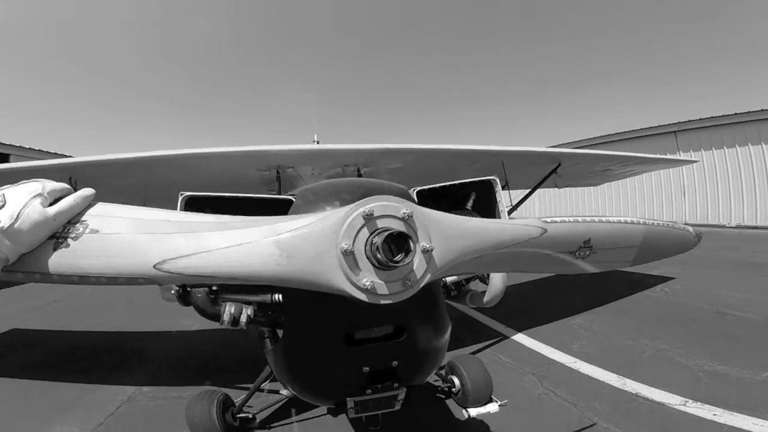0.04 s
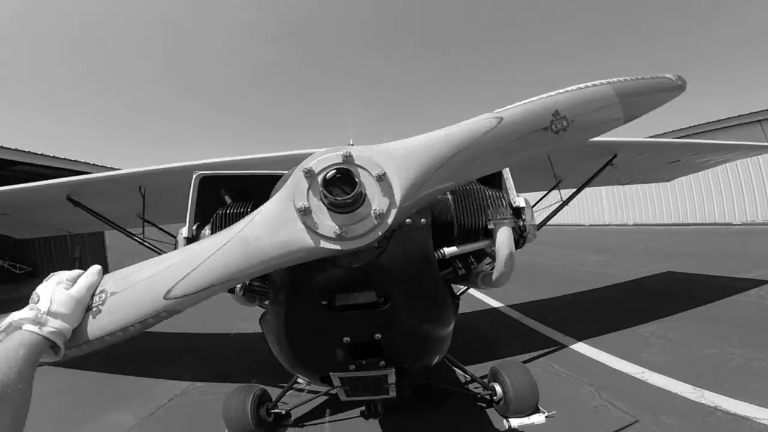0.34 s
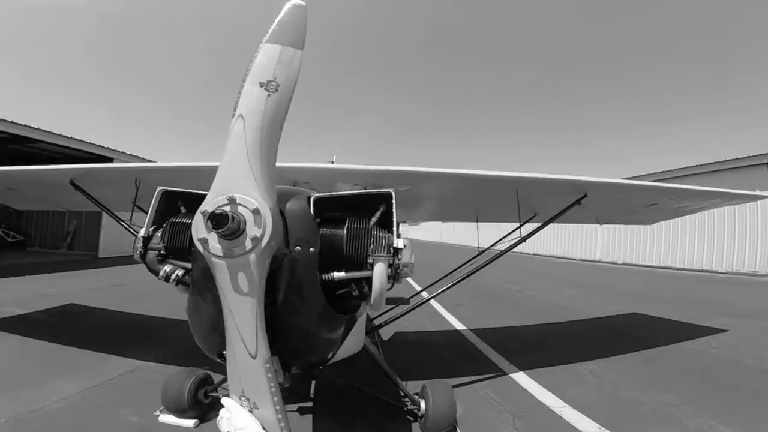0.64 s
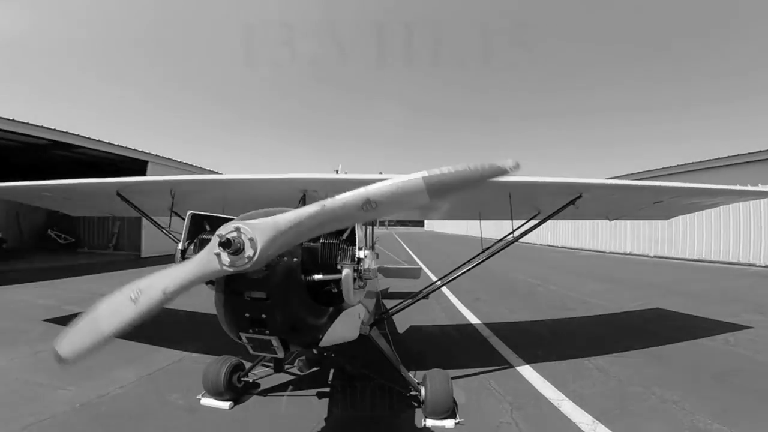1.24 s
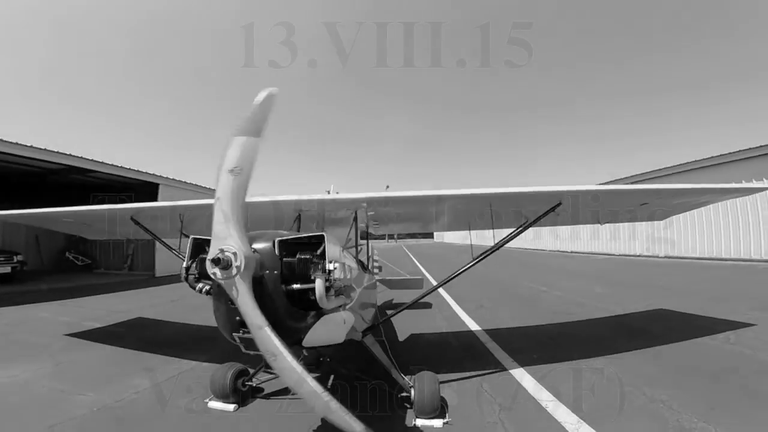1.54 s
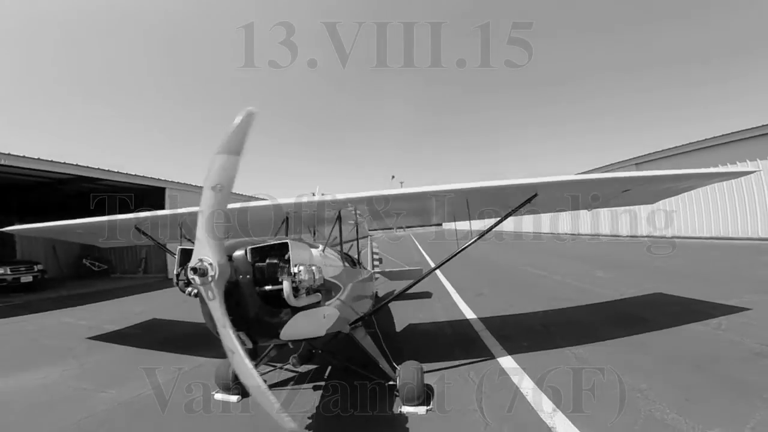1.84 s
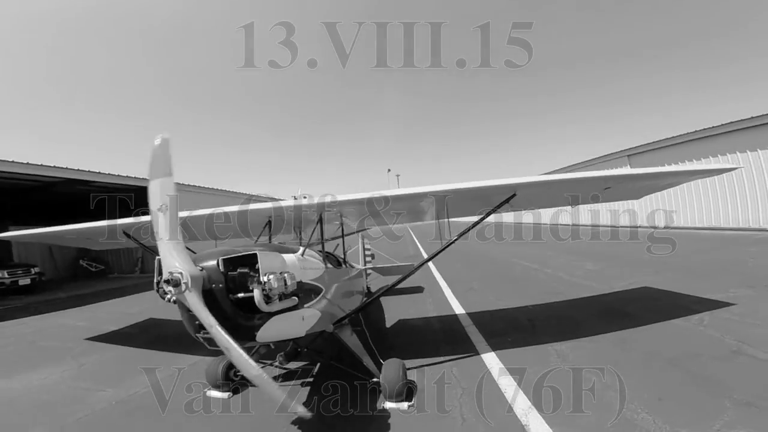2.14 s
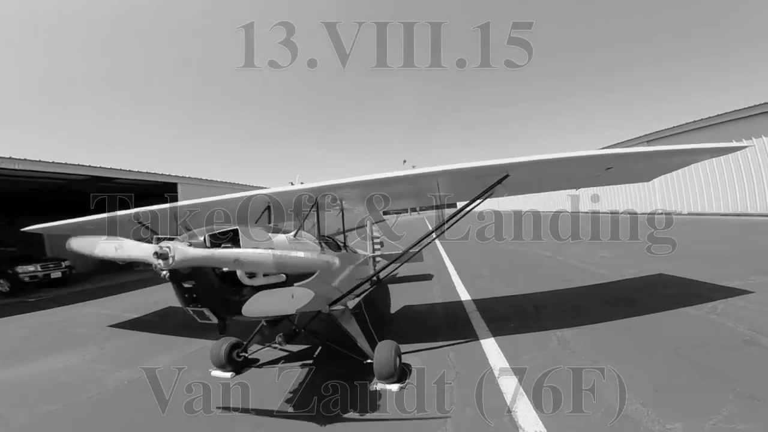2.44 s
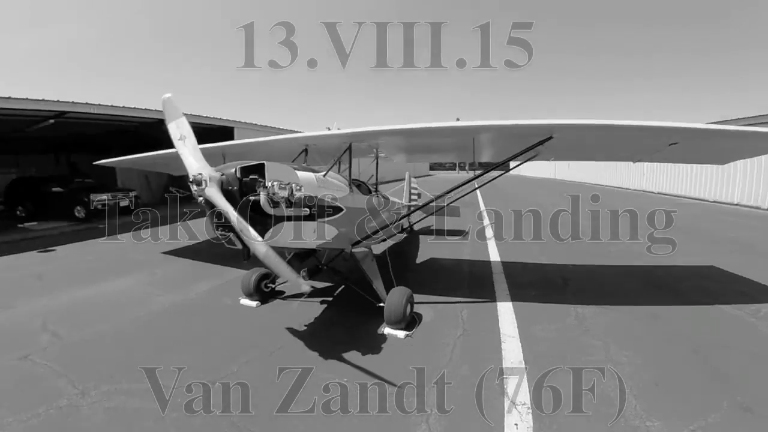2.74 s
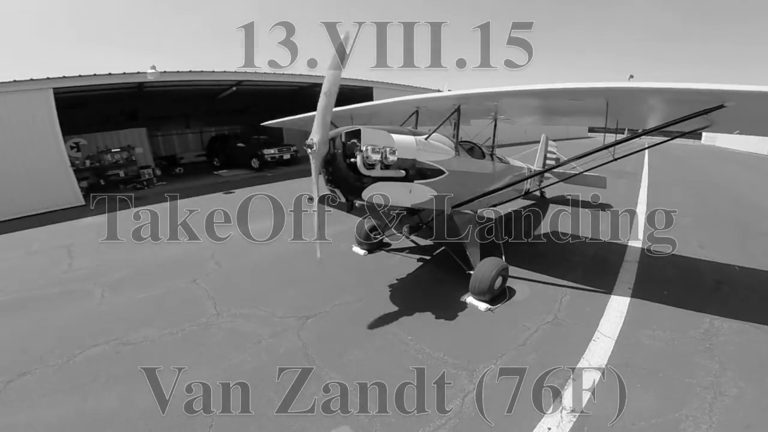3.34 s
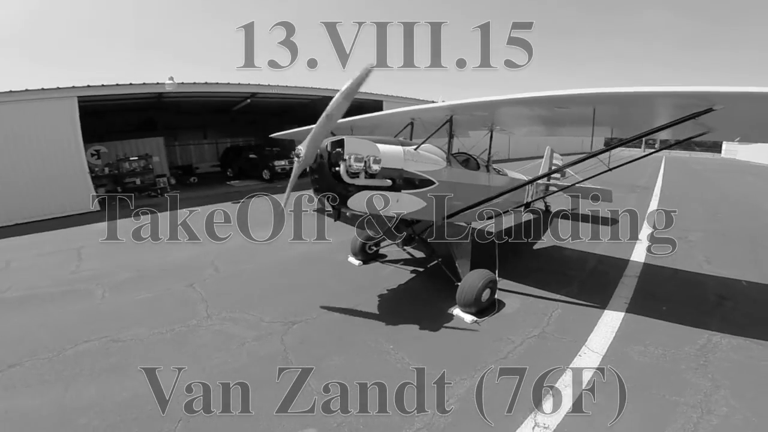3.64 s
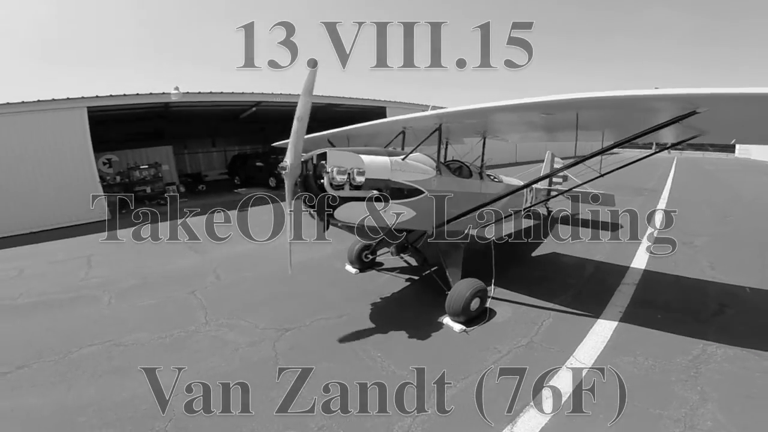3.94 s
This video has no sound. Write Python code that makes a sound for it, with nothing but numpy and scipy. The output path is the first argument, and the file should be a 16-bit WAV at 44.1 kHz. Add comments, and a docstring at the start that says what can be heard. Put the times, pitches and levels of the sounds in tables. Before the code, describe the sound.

A small airplane engine is started by hand outdoors, close to the microphone. It rasps as it turns, gives a metallic clack, then fires with hissing pops and chugs unevenly while wind and propeller wash buffet the microphone.

```python
"""A small airplane engine is swung by hand on an open apron and catches, close to the microphone.
Each firing vents a puff of turbulent gas that hisses and excites the resonances of the exhaust stacks.
The magneto's impulse coupling clacks and rings the crankcase; between firings the engine coasts on
with dull compression chugs over the clatter of gears and valves. Wind and propeller wash buffet
the microphone."""
import sys
import numpy as np
from scipy import signal
from scipy.fft import rfft, irfft
from scipy.io import wavfile

SR = 44100
rng = np.random.default_rng(int(sys.argv[2]) if len(sys.argv) > 2 else 0)


def inscribe(sig):
    """Save sig as 16-bit PCM at rate SR to the path in sys.argv[1].

    A 1-D sig is mono; a 2-D sig holds one channel per row.
    Samples are clipped to [-1, 1] before scaling.
    """
    pcm = np.round(np.clip(np.atleast_2d(sig).T, -1, 1) * 32767)
    wavfile.write(sys.argv[1], SR, pcm.astype(np.int16))


N = 176400

# exhaust puffs: peak_s, hiss_db, stack_ring_db, body_db, pressure_wave_db, half_width_s
EXHAUST_PUFFS = [(1.087, -27, -30, -27, -12, 0.0068), (1.271, -25.5, -25, -13.5, -11, 0.012),
                 (1.411, -27.5, -36.5, -20.5, -13, 0.013), (1.525, -29, -38, -18.5, -8.5, 0.011),
                 (2.771, -35, -37, -32, -31, 0.0087), (2.803, -23.5, -20.5, -15, -10, 0.0097),
                 (2.881, -32.5, -46, -20, -24, 0.0049), (2.935, -21.5, -20.5, -13.5, -7.5, 0.0099),
                 (3.188, -29, -18, -15, -9, 0.0085), (3.564, -28, -34, -19.5, -11, 0.011),
                 (3.796, -23, -23.5, -17.5, -8, 0.01)]
# spectra of a puff's hiss and hollow body: frequency_hz, density_db
HISS_SPECTRUM = [(300, -36.5), (900, -16), (1600, 2.5), (2300, 1.5), (2900, 0), (4100, 7.5), (5000, -3),
                 (6300, -6.5), (7700, -20.5)]
PUFF_BODY_SPECTRUM = [(40, -17), (90, -0.5), (200, -2.5), (280, -3.5), (480, -5), (590, -2), (700, -9.5),
                      (950, -10.5), (2000, -32), (6000, -57)]
# resonances of the exhaust stacks: pitch_hz, bandwidth_hz, level_db
STACK_MODES = [(1284, 48, 3), (2715, 70, 4), (2905, 110, 2.5), (3423, 55, 2), (3887, 57, -0.5),
               (4190, 57, -7)]
# blows of the coupling: start_s, level_db, treble_db, rebound_delay_s, rebound_db, hollow_hz, hollow_db
COUPLING_BLOWS = [(.850, -6.5, 1.5, 0.033, -3, 520, -4.5), (1.124, -12, -0.5, .019, 2.5, 820, -8.5),
                  (1.319, -13, -5, .022, 1, 630, -1), (2.970, -10, -1, 0.0079, -10, 864, -1.5)]
# modes of the crankcase: pitch_hz, level_db, t60_s
CRANKCASE_MODES = [(178.5, -7, 0.37), (330, 3.5, 0.81), (459.7, 11, 0.18), (612, 4.5, 0.61), (823, 1, 0.12),
                   (1030, -5.5, 0.13), (1474, -5, 0.32), (1630, 0, 0.22), (2086, -12, 0.49), (2440, 9, 0.1),
                   (2990, -1, 0.32)]
# piston chugs: start_s, level_db, treble_db
PISTON_CHUGS = [(.283, -25, -41), (0.412, -19, -25), (.611, -21.5, 1), (0.82, -24.5, 8),
                (1.248, -15.5, -24), (1.623, -23.5, -2), (1.73, -19.5, 1.5), (1.86, -16.5, -7),
                (1.977, -19, 0.5), (2.091, -22.5, 2), (2.222, -14.5, -6.5), (2.375, -17.5, 1),
                (2.520, -16.5, -1), (2.663, -14.5, -5), (3.079, -16.5, -2), (3.305, -27.5, 8.5),
                (3.444, -14.5, 2), (3.591, -15, -21), (3.675, -20.5, 2.5), (3.926, -19, 5)]
# running clatter: time_s, body_db, treble_db
CLATTER_LEVELS = [(0, -40, -55), (.17, -37.5, -68), (.26, -49, -72), (.39, -43.5, -54), (.5, -33.5, -54.5),
                  (.73, -38.5, -51.5), (.8, -32, -38.5), (.97, -32.5, -45.5), (1.1, -24, -34.5),
                  (1.4, -22.5, -34.5), (1.7, -27.5, -41.5), (2.05, -28, -45), (2.621, -25, -44.5),
                  (2.85, -18.5, -32.5), (3.12, -27, -38), (3.401, -26.5, -40), (3.749, -25, -40),
                  (4, -27, -36.5)]
# rubs of the valve gear: start_s, level_db, hold_s
VALVE_RUBS = [(.443, -27, 0.0074), (0.472, -30.5, 0.019), (0.678, -35, 0.0032), (0.747, -44, 0.025),
              (0.823, -26, 0.016), (0.988, -24, 0.023), (1.173, -29, 0.0074), (1.361, -23.5, 0.012),
              (2.733, -21, 0.076), (2.872, -27, 0.024), (3.038, -20, .013)]
# rasp and sizzle of the slowly turned engine: time_s, level_db
RASP_LEVELS = [(0, -34), (.05, -34), (.17, -37), (.26, -53.5), (.4, -74)]
SIZZLE_LEVELS = [(0, -66), (.28, -61.5), (.42, -56), (.65, -51.5), (.8, -67), (1.0, -91)]
# metallic resonances of the sizzle: pitch_hz, bandwidth_hz, level_db
SIZZLE_MODES = [(1970, 110, 4), (2480, 54, 10), (3096, 130, -8.5), (3600, 220, 3), (3850, 240, -1.5),
                (4800, 600, -10)]
# spectra of the mechanical noises: frequency_hz, density_db
CLACK_SPECTRUM = [(60, -26.5), (125, -15.5), (178, 3), (260, -7), (480, 1.5), (680, 6), (950, -4.5),
                  (1200, -7), (1650, -7.5), (2500, -8.5), (3300, -18), (4600, -20.5), (6000, -38.5),
                  (7700, -62)]
CHUG_SPECTRUM = [(60, -6.5), (130, 1), (200, 8), (260, -9), (320, 4), (400, -3), (500, 1.5), (740, -2.5),
                 (900, -9.5), (1300, -19), (2200, -28.5), (4000, -38), (7700, -56.5)]
CLATTER_BODY_SPECTRUM = [(60, -4), (130, 1.5), (195, 6), (265, -5.5), (320, 4), (390, -6), (490, 0.5),
                         (720, -5.5), (880, -10), (1050, -12), (1400, -20), (2500, -33), (7000, -61)]
CLATTER_TREBLE_SPECTRUM = [(400, -26), (1100, 4.5), (2100, -1), (3000, -7.5), (4400, -13), (5500, -18),
                           (7700, -29)]
SCRAPE_SPECTRUM = [(100, -0.5), (300, 1.5), (650, 6), (1300, -8), (2000, -6.5), (3000, -16.5),
                   (5000, -21.5), (7700, -54)]
RASP_SPECTRUM = [(200, -23.5), (450, 0.5), (600, 2), (800, 6.5), (1150, 0), (1450, -8), (2100, -11.5),
                 (2800, -22), (4200, -29.5), (7000, -57)]
# wind on the microphone: time_s, level_db
WIND_LEVELS = [(0, -31.5), (.45, -28.5), (.72, -33.5), (1.0, -45), (1.25, -32.5), (1.53, -19.5),
               (1.75, -29.5), (1.95, -20.5), (2.25, -18.5), (2.501, -23), (2.7, -17), (2.84, -12.5),
               (3.02, -22), (3.3, -19), (3.65, -19.5), (3.88, -15.5), (4, -19)]
# bursts of propeller wash: peak_s, level_db, half_width_s
WASH_BURSTS = [(2.151, -17.5, 0.072), (2.269, -16, 0.07), (3.092, -16, 0.0058), (3.479, -14.5, 0.045),
               (3.942, -13, 0.044)]
# spectra of wind and wash: frequency_hz, density_db
WIND_SPECTRUM = [(8, 1.5), (18, -1.5), (27, 3), (40, -2), (70, -4), (110, -11.5), (200, -27), (500, -50.5),
                 (2000, -78)]
WASH_SPECTRUM = [(20, -43.5), (50, 7.5), (80, 1.5), (120, -12.5), (190, -3.5), (300, -16.5), (800, -41),
                 (3000, -64.5)]

PUFF_WAVE_HZ, PUFF_WAVE_WIDTH_S, PUFF_WAVE_LAG_S = 27, 0.022, 0.008
BODY_LAG_S, BODY_WIDTH_RATIO, PUFF_TAIL_DB, PUFF_TAIL_T60_S = 0.011, 1.9, -19, 0.42
CLACK_RISE_S, CLACK_HOLD_S, CLACK_TAIL_DB, CASE_RING_DB = 0.002035, 0.0071, -3, -10
CRACK_DB, REBOUND_CRACK_DB, CRACKLE_DB, HOLLOW_WIDTH_HZ = 3, 18.5, 2, 82
TICKS_PER_S, TICK_SPREAD_DB, TICK_POWER_SHARE = 700, 0.5, 0.33
CLATTER_FLUTTER_DB, SIZZLE_FLICKER_DB, GUST_DB = -0.5, 2, 2
WASH_RATE_HZ, WASH_JITTER, WASH_NOISE_GAIN = 45, 0.15, 0.6
SHELF_HZ, MIC_BAND_HZ, OUTPUT_BAND_HZ, CEILING, KNEE_SHARPNESS = 625, 7750, 16000, 0.95, 23


def exhaust_puffs():
    """Turbulent outflow hisses and drives stack resonances, with a hollow body and a pressure pulse."""
    t = clock()
    hiss, ring, body, wave = np.zeros((4, N))
    for peak_s, hiss_db, ring_db, body_db, wave_db, width_s in EXHAUST_PUFFS:
        age = t - peak_s
        swell = np.exp(1 - np.hypot(1, np.sqrt(2) * age / width_s))
        flow = swell + amp(PUFF_TAIL_DB) * envelope(age, width_s, 0, PUFF_TAIL_T60_S)
        hiss += amp(hiss_db) * flow
        ring += amp(ring_db) * flow
        body += amp(body_db) * np.exp(-((age - BODY_LAG_S) / (BODY_WIDTH_RATIO * width_s)) ** 2)
        wave_age = age - PUFF_WAVE_LAG_S
        window = np.exp(-(wave_age / PUFF_WAVE_WIDTH_S) ** 2)  # leaves one push and pull of air
        wave -= amp(wave_db) * np.sin(2 * np.pi * PUFF_WAVE_HZ * wave_age) * window
    hiss_noise, ring_noise, body_noise = rng.standard_normal((3, N))
    jet = colour(hiss * hiss_noise, HISS_SPECTRUM)
    stacks = resonances(ring * ring_noise, STACK_MODES)
    return jet + stacks + colour(body * body_noise, PUFF_BODY_SPECTRUM) + wave


def coupling_clacks():
    """Impact excitation: the coupling snaps and rebounds with a crack, a hollow bark and a ring."""
    out, t = np.zeros(N), clock(SR // 2)
    for start_s, level_db, treble_db, delay_s, rebound_db, hollow_hz, hollow_db in COUPLING_BLOWS:
        snap = envelope(t, CLACK_RISE_S, CLACK_HOLD_S, t60_s=0.076)
        rebound = amp(rebound_db) * envelope(t - delay_s, CLACK_RISE_S, hold_s=0.00084, t60_s=0.077)
        tail = amp(CLACK_TAIL_DB) * envelope(t, CLACK_RISE_S, CLACK_HOLD_S, t60_s=0.26)
        crackle = unit(amp(CRACKLE_DB * drift(rate_hz=254)))[:len(t)]
        force = np.sqrt(snap ** 2 + rebound ** 2 + tail ** 2) * crackle * rng.standard_normal(len(t))
        # each crack is a one-sample impulse
        add(force, CLACK_RISE_S, amp([CRACK_DB]))
        add(force, CLACK_RISE_S + delay_s, amp([REBOUND_CRACK_DB + rebound_db]))
        bark = resonances(np.hypot(snap, rebound) * rattle(len(t)), [(hollow_hz, HOLLOW_WIDTH_HZ, 0)])
        blow = colour(force, CLACK_SPECTRUM, treble_db)
        ring = amp(CASE_RING_DB) * crankcase(force)
        add(out, start_s, amp(level_db) * (amp(hollow_db) * bark + blow + ring))
    return out


def crankcase(force):
    """Modal superposition: the case answers a force with a sum of damped sinusoids."""
    t = clock(SR // 2)
    ring = sum(amp(db) * np.exp(-np.log(1000) * t / t60_s) * np.sin(2 * np.pi * hz * t)
               for hz, db, t60_s in CRANKCASE_MODES)
    return signal.oaconvolve(force, ring / np.linalg.norm(ring))[:len(force)]


def piston_chugs():
    """Damped transients: a dull rattling thud as a piston goes over compression."""
    out, t = np.zeros(N), clock(SR // 3)
    for start_s, level_db, treble_db in PISTON_CHUGS:
        force = amp(level_db) * envelope(t, rise_s=0.0047, hold_s=0.014, t60_s=0.13) * rattle(len(t))
        add(out, start_s, colour(force, CHUG_SPECTRUM, treble_db))
    return out


def gear_clatter():
    """Many small impacts of gears and valves add incoherently into a continuous chatter."""
    time_s, body_db, treble_db = np.transpose(CLATTER_LEVELS)
    flutter_db = CLATTER_FLUTTER_DB * drift(rate_hz=31)
    body = rattle(N) * amp(np.interp(clock(), time_s, body_db) + flutter_db)
    treble = rattle(N) * amp(np.interp(clock(), time_s, treble_db) + flutter_db)
    return colour(body, CLATTER_BODY_SPECTRUM) + colour(treble, CLATTER_TREBLE_SPECTRUM)


def valve_scrapes():
    """Sliding friction in the valve gear gives short rubs of metallic noise."""
    level = sum(amp(db) * envelope(clock() - start_s, rise_s=0.005, hold_s=hold_s, t60_s=0.11)
                for start_s, db, hold_s in VALVE_RUBS)
    return colour(level * rattle(N), SCRAPE_SPECTRUM)


def hand_turning():
    """The engine, pulled round slowly, rasps; then noise-driven resonances sizzle faintly."""
    rasp = colour(rattle(N) * amp(contour(RASP_LEVELS)), RASP_SPECTRUM)
    sizzle_db = contour(SIZZLE_LEVELS) + SIZZLE_FLICKER_DB * drift(rate_hz=17)
    return rasp + resonances(rattle(N) * amp(sizzle_db), SIZZLE_MODES)


def propeller_wash():
    """Eddies strike the microphone as a nearly periodic pulse train, heard in fluttering bursts."""
    bursts = sum(amp(db) * np.exp(-((clock() - peak_s) / width_s) ** 2)
                 for peak_s, db, width_s in WASH_BURSTS)
    cycles = np.cumsum(WASH_RATE_HZ * (1 + WASH_JITTER * drift(rate_hz=30))) / SR
    eddies = unit(np.diff(np.floor(cycles), prepend=0))  # one pulse a cycle
    return bursts * unit(colour(eddies + WASH_NOISE_GAIN * rng.standard_normal(N), WASH_SPECTRUM))


def wind():
    """Turbulent pressure fluctuations at the microphone make a low, gusting rumble."""
    rumble = unit(colour(rng.standard_normal(N), WIND_SPECTRUM))
    return rumble * amp(contour(WIND_LEVELS) + GUST_DB * drift(rate_hz=5.4))


def rattle(size):
    """Shot noise: random impacts of uneven strength, mixed with white noise."""
    hits = (rng.random(size) < TICKS_PER_S / SR) * rng.choice([-1, 1], size)
    ticks = unit(hits * amp(TICK_SPREAD_DB * np.minimum(rng.exponential(1, size), np.pi)))
    return np.sqrt(TICK_POWER_SHARE) * ticks + np.sqrt(1 - TICK_POWER_SHARE) * rng.standard_normal(size)


def resonances(x, modes):
    """Parallel resonators of unit total power; the wider the band, the faster the decay."""
    t = clock(SR // 8)
    ring = sum(amp(db) * np.sqrt(width_hz) * np.exp(-np.pi * width_hz * t) * np.cos(2 * np.pi * hz * t)
               for hz, width_hz, db in modes)
    return signal.oaconvolve(x, ring / np.linalg.norm(ring))[:len(x)]


def colour(x, spectrum, treble_db=0):
    """Minimum-phase filter: a spectrum scaled to unit power, then a treble shelf."""
    size = 8192
    hz = abs(np.fft.fftfreq(size, 1 / SR)) + 1
    points_hz, points_db = np.transpose(spectrum)
    shelf = amp(treble_db / (1 + (SHELF_HZ / hz) ** 2))
    gain = unit(amp(np.interp(np.log(hz), np.log(points_hz), points_db))) * shelf
    taps = np.fft.ifft(np.exp(np.conj(signal.hilbert(np.log(gain)))))
    return signal.oaconvolve(x, taps.real[:size // 2])[:len(x)]


def drift(rate_hz):
    """Low-passed Gaussian noise: a random wandering of rms one."""
    roll_off = np.exp(-(np.fft.rfftfreq(N, 1 / SR) / rate_hz) ** 2)
    return unit(irfft(rfft(rng.standard_normal(N)) * roll_off, N))


def envelope(t, rise_s, hold_s, t60_s):
    """Linear attack, hold and exponential decay."""
    return np.clip(t / rise_s, 0, 1) * np.exp(-np.log(1000) * np.maximum(t - rise_s - hold_s, 0) / t60_s)


def contour(points):
    """Linear interpolation of levels over time."""
    return np.interp(clock(), *np.transpose(points))


def add(mix, start_s, sound):
    """Superposes a sound on the mix."""
    part = mix[round(start_s * SR):][:len(sound)]
    part += sound[:len(part)]


def amp(db):
    """Decibels to amplitude ratio."""
    return 10 ** (np.asarray(db) / 20)


def unit(x):
    """Scales to an rms of one."""
    return x / np.sqrt(np.mean(x ** 2) + 1e-20)


def clock(size=N):
    """Sample times in seconds."""
    return np.arange(size) / SR


def low_pass(x, hz):
    """Steep linear-phase band limit."""
    return signal.oaconvolve(x, signal.firwin(511, hz, window=("kaiser", 9), fs=SR)[None], "same")


def scene():
    """Superposition: the pressures of engine and moving air add at one microphone."""
    engine = exhaust_puffs() + coupling_clacks() + piston_chugs()
    mechanism = gear_clatter() + valve_scrapes() + hand_turning()
    return (engine + mechanism + propeller_wash() + wind())[None]


def record(dry):
    """Saturation: a narrow-band microphone rounds off the loudest peaks."""
    narrow = low_pass(np.pad(dry, ((0, 0), (0, 512))), MIC_BAND_HZ)
    clipped = narrow / (1 + abs(narrow / CEILING) ** KNEE_SHARPNESS) ** (1 / KNEE_SHARPNESS)
    return low_pass(clipped, OUTPUT_BAND_HZ)[:, :N]


dry = scene()
out = record(dry)
inscribe(out)
```